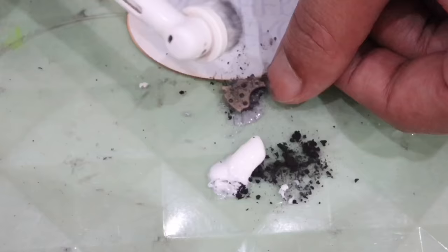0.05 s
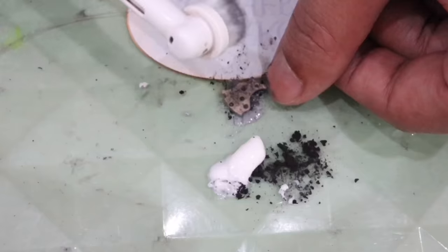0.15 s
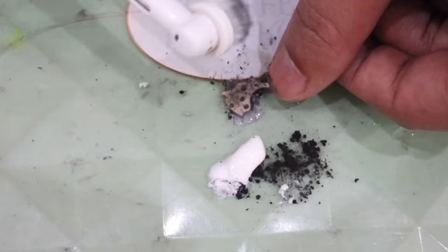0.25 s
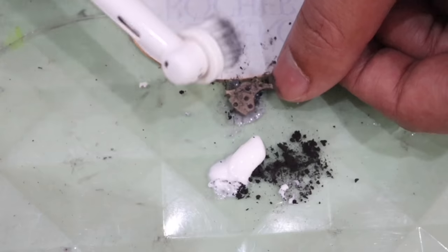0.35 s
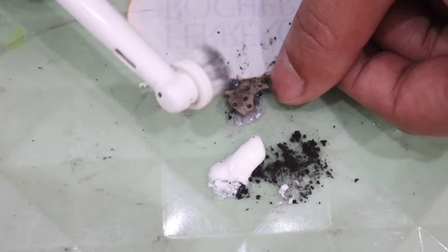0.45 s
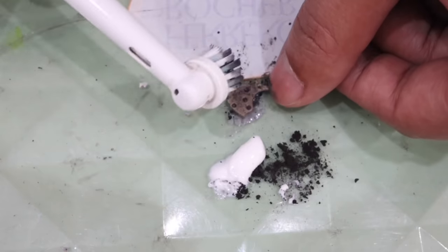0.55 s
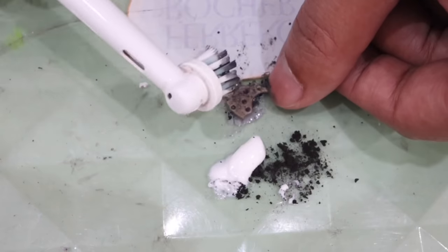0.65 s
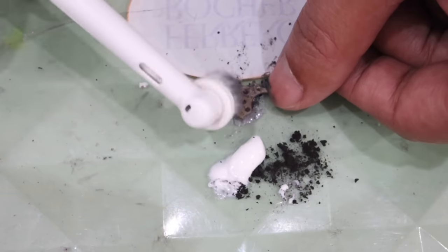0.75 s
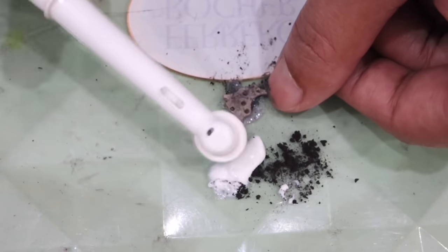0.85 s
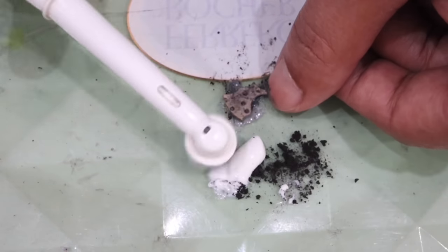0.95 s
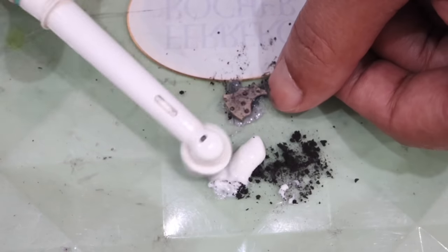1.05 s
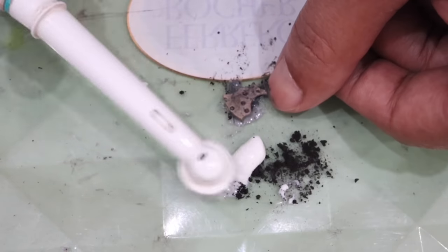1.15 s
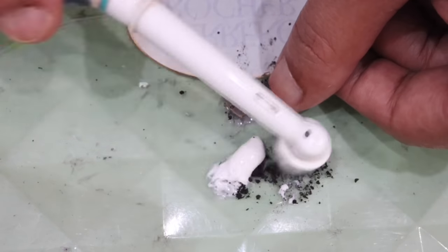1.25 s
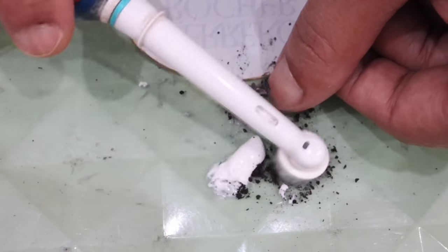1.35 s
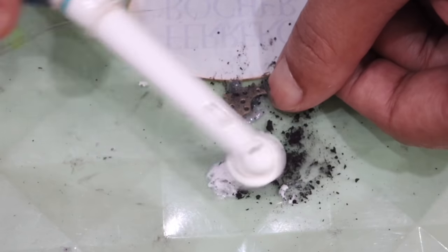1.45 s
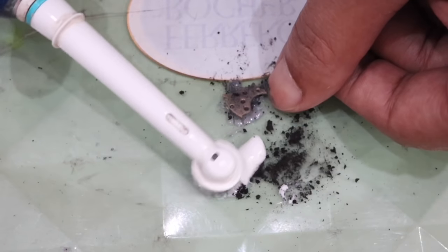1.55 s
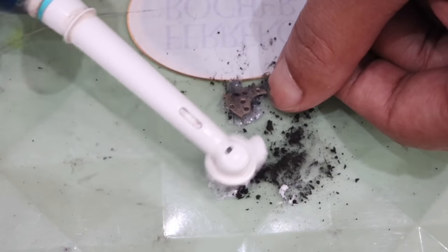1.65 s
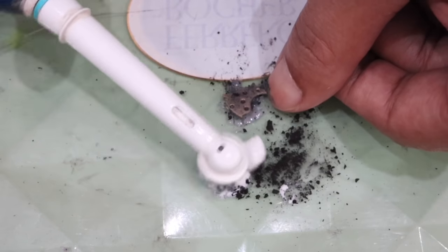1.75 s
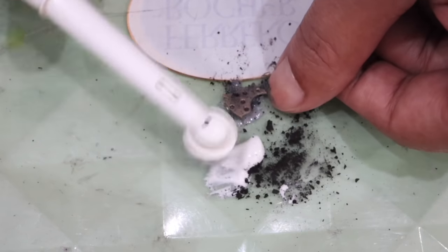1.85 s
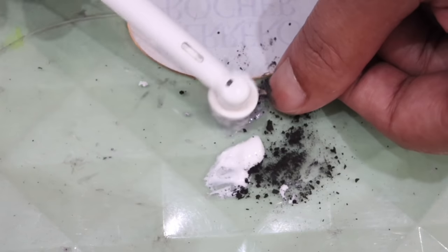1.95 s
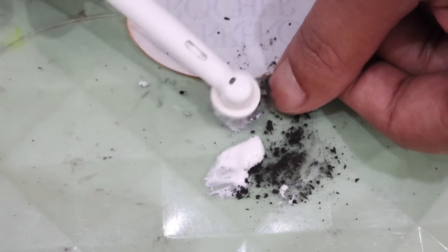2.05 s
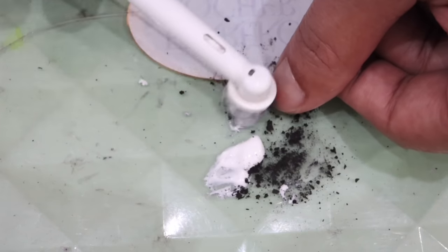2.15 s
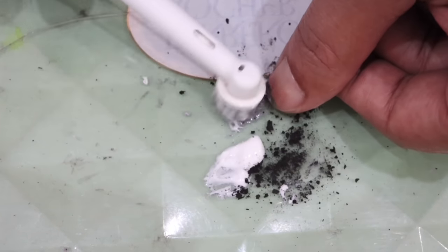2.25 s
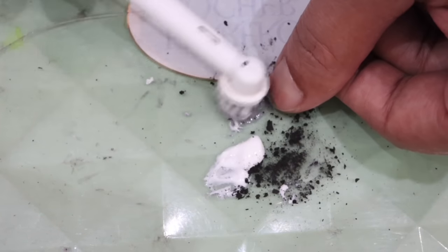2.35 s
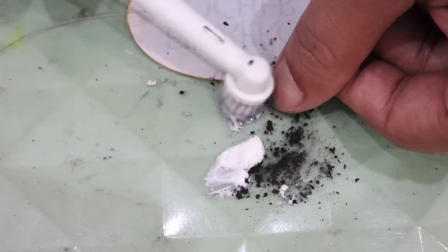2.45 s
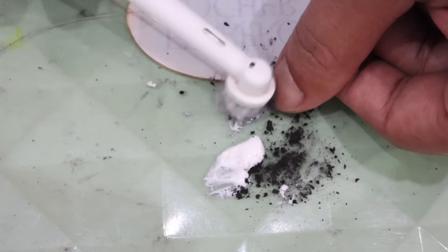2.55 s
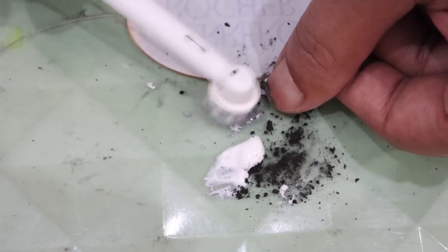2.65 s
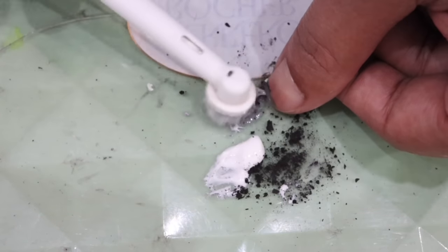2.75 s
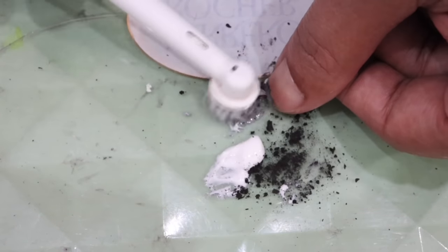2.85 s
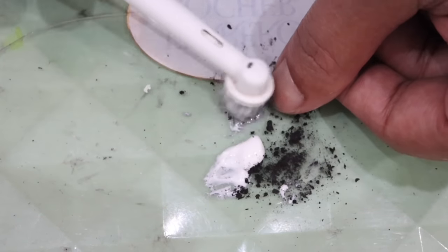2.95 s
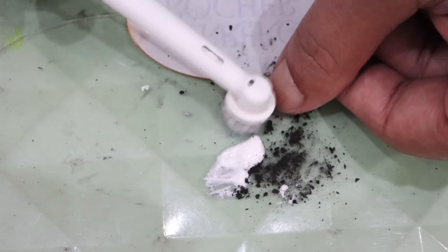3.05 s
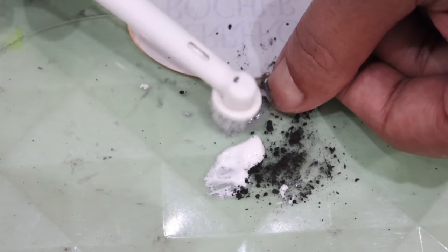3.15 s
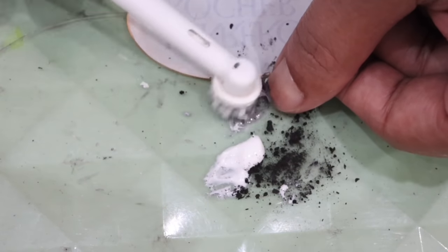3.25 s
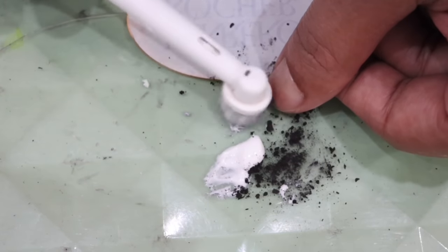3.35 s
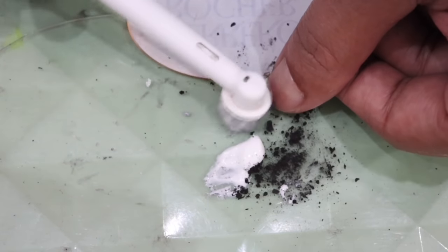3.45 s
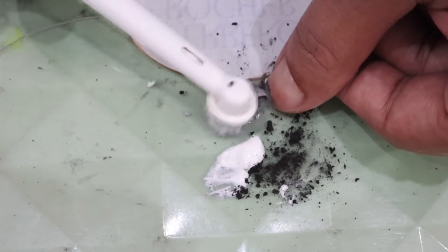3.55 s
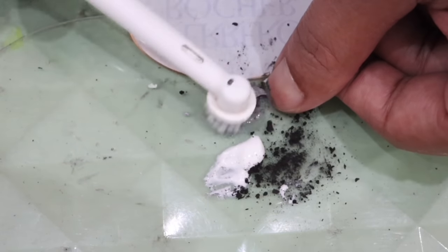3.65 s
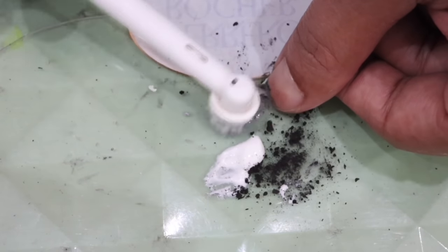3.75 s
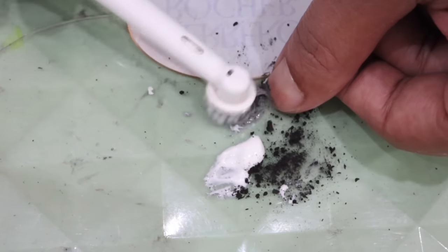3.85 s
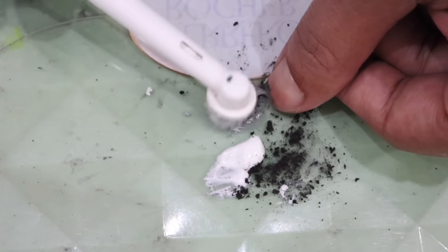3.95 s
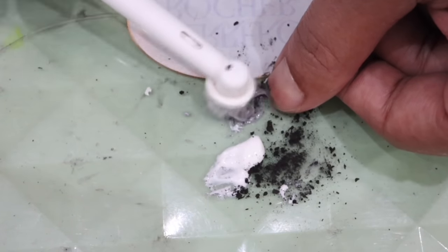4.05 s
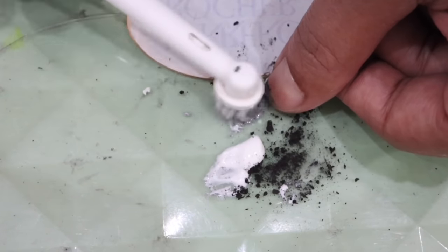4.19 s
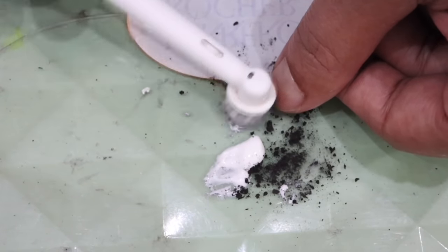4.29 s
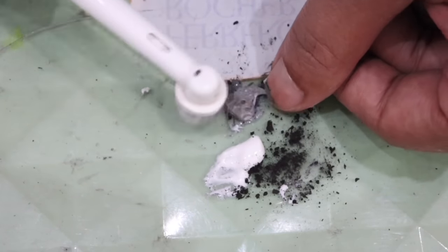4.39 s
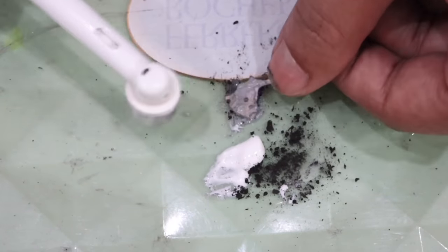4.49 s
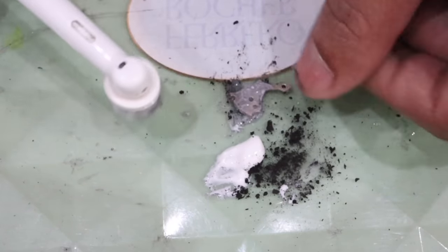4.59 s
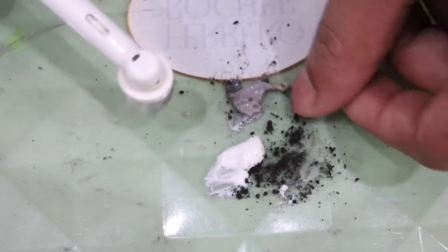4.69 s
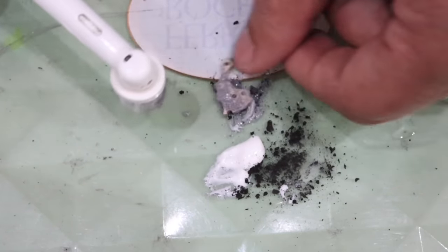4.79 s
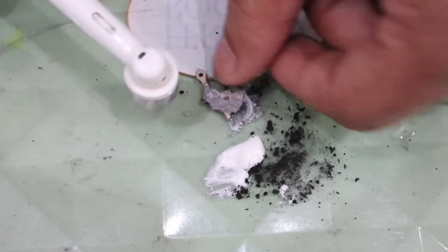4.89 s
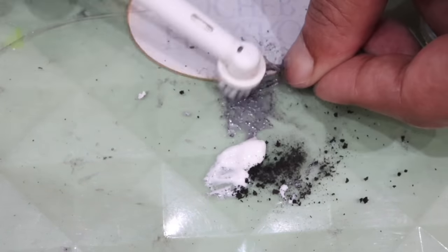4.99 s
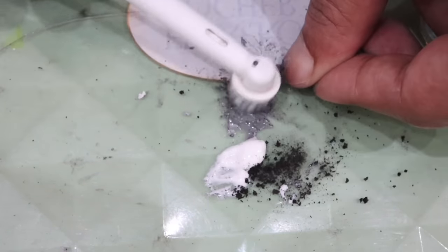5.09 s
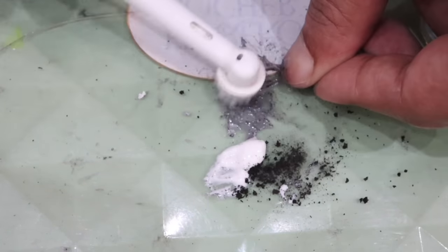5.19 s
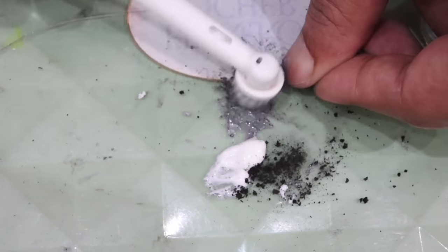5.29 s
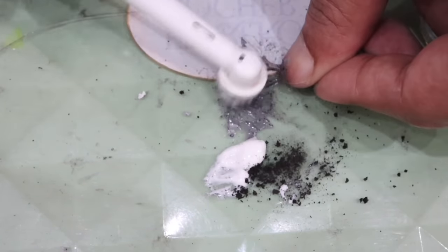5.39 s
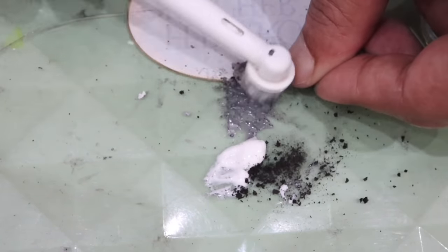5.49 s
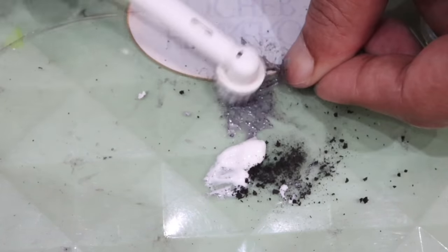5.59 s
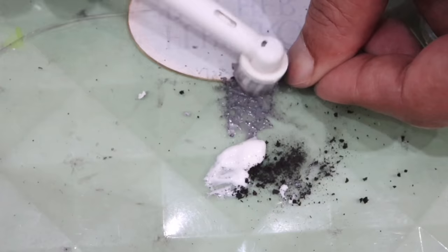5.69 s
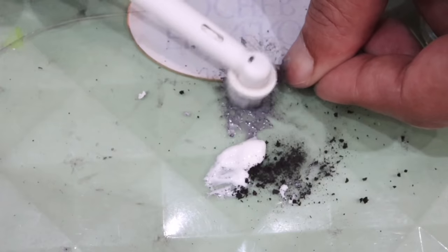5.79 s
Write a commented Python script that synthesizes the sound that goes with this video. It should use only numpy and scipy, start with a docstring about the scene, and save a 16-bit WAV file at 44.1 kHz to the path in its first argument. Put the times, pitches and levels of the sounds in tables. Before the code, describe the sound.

After half a second of silence, a small electric brush whirs close by in a quiet room. A hand shuffles on the bench and the head taps the glass plate. From about two seconds, bristles rub a small metal part in bursts, the whine swelling and buzzing under pressure, then brisk bright strokes to the end. Close stereo microphone.

```python
"""At a workbench in a quiet room, a small electric brush in the hand scrubs a tiny metal part on a glass plate.
Its gear train sounds tones locked to the big gear and pulsed noise whose tooth pattern repeats every turn.
Pressed down, the plate radiates the whine and rumbles; taps of the head ring its modes. After two handling
noises, each stroke of the bristles over paste and metal is resonant noise. The hand shuffles and bumps the bench."""
import sys
import numpy as np
from scipy import signal
from scipy.fft import rfft, irfft, next_fast_len
from scipy.io import wavfile
from scipy.ndimage import uniform_filter1d

SR = 44100
rng = np.random.default_rng(int(sys.argv[2]) if len(sys.argv) > 2 else 0)


def dump(signal):
    """Clip the signal to [-1, 1] and save it as 16-bit WAV at the path in sys.argv[1]."""
    limited = np.clip(np.atleast_2d(signal).T, -1, 1)
    pcm = np.round(limited * 32767).astype(np.int16)
    wavfile.write(sys.argv[1], SR, pcm)


N = 257103
TIME = np.arange(N) / SR  # [s]
START_S = 0.528  # the sound opens here
WHINE_ORDER = 50  # whine cycles per turn of the big gear
SWING_ORDER = 11  # swings of the tuft per turn of the big gear

# the head stays on the work:
# (touch time [s], lift time [s], resting hiss at touch [dB], resting hiss at lift [dB])
CONTACTS = [(2.229, 2.35, -48, -57), (2.623, 3.349, -58.5, -54), (3.489, 3.676, -52, -51),
            (3.741, 3.747, -70, -67), (3.836, 3.943, -54, -70), (4.054, 5.9, -57, -47.5)]
# two microphone ports hearing the motor: (frequency [Hz], likeness [0-1], left lead [rad], left minus right [dB])
PORTS_MOTOR = [(20, 1, 0, 0), (110, 1, 0, 0), (170, .98, 0, 0), (330, .4, 0, 1.5), (950, .4, -.6, 2),
               (1500, .6, 0, 5), (2900, .7, .8, 3), (4570, .6, 1.1, 1), (6800, .6, 2.4, 2),
               (11300, .6, 2.3, 2.5), (16000, .6, 2.4, 2.5)]
# the same ports hearing the work: (frequency [Hz], likeness [0-1], left lead [rad], left minus right [dB])
PORTS_WORK = [(20, 1, 0, 0), (640, 1, 0, 0), (1900, .995, 0, 0), (2500, .93, .25, 0), (3300, .75, .7, 0),
              (4740, .65, 1.5, 0), (6800, .6, 2.2, -.5), (10000, .6, 1.9, 0), (13000, .6, 1.7, 1),
              (16000, .55, 2.2, 1.5)]
# resonances of the housing: (frequency [Hz], width [Hz], height [dB])
HOUSING_RINGS = [(2420, 20, -12), (2700, 20, 4), (4910, 420, 0), (7690, 110, -6), (10400, 530, -11.5),
                 (13100, 74, 7)]


def gain_of(db):
    """Amplitude ratio: 20 dB is a factor of ten."""
    return 10 ** (np.asarray(db) / 20)


def evened(x):
    """Normalises mean power: scales to rms 1."""
    return x / np.sqrt(np.mean(x ** 2) + 1e-20)


def read(points, hz):
    """Interpolates the columns of a spectrum linearly on a log-frequency axis."""
    f, *columns = np.transpose(points)
    return np.squeeze([np.interp(np.log(hz + 1), np.log(f + 1), c) for c in columns])


def curve(rows):
    """Interpolates each column of a table linearly over time."""
    s, *columns = np.transpose(rows)
    return [np.interp(TIME, s, c) for c in columns]


def add(mix, s, sound):
    """Superposition: adds a sound to the mix from time s [s]."""
    part = mix[..., round(s * SR):][..., :sound.shape[-1]]
    part += sound[..., :part.shape[-1]]


def wander(hz):
    """Relaxation noise: a one-pole low-pass at hz turns white noise into a drift of rms 1."""
    pole = np.exp(-2 * np.pi * hz / SR)
    return evened(signal.lfilter([1], [1, -pole], rng.standard_normal(N)))


def slow(hz):
    """Smoothed drift: a moving average of half a period smooths relaxation noise, rms 1."""
    return evened(uniform_filter1d(wander(hz), round(SR / hz / 2)))


def coloured(drive, colour, ports, rings=()):
    """Source-filter principle: spectrum and resonances shape two drives, mixed to the ports' coherence."""
    size = next_fast_len(N)
    hz = np.fft.rfftfreq(size, 1 / SR)
    shared, differing = rfft(drive, size)
    likeness, lead, lean_db = read(ports, hz)
    side = np.array([[.5], [-.5]])  # left, right
    angle = np.arccos(np.clip(likeness, 0, 1)) / 2  # cos(2 * angle) is the correlation
    pair = shared * np.cos(angle) + 2 * side * differing * np.sin(angle)
    pair = pair * np.exp(1j * lead * side)
    peaks = 1 + sum(gain_of(db) / (1 + (2 * (hz - f) / w) ** 2) for f, w, db in rings)
    level = gain_of(read(colour, hz) + lean_db * side)
    return evened(irfft(pair * peaks * level, size)[:, :N])


def grit(grain_db, flutter_db, flutter_hz):
    """Granular noise: random grain sizes and a quick flutter modulate two drives alike."""
    grain = np.minimum(rng.exponential(1, N), 3)
    size = gain_of(grain_db * grain + flutter_db * wander(flutter_hz))
    return rng.standard_normal((2, N)) * size


def touch(start, end):
    """Contact envelope: a linear landing, then an exponential release after the lift."""
    land_s, lift_db_per_s = 0.017, 406
    return np.clip((TIME - start) / land_s, 0, 1) * gain_of(-lift_db_per_s * np.maximum(TIME - end, 0))


def room_tone():
    """Steady background: stationary noise with a fixed spectrum."""
    # colour of the quiet room: (frequency [Hz], relative density [dB per Hz])
    room_colour = [(12, -50), (25, -11), (80, -2.5), (300, -10), (500, -8.5), (900, -27), (1500, -39),
                   (2200, -25.5)]
    return gain_of(-77) * coloured(rng.standard_normal((2, N)), room_colour, PORTS_MOTOR)


def shuffle():
    """Sliding friction: lumpy low noise of the hand on the bench swells, sags and stops."""
    # colour of the bench: (frequency [Hz], relative density [dB per Hz])
    bench_colour = [(15, 4), (40, 0), (80, -4), (150, 0), (450, -10.5), (1000, -6), (1500, -14.5)]
    top_s, end_s, top_db, lumps_db = 0.606, 0.754, -58, 3.5
    rise_db_per_s, sag_db_per_s, stop_db_per_s = 130, 45, 600  # the stop adds to the sag
    since = TIME - top_s
    level_db = top_db + np.minimum(rise_db_per_s * since, -sag_db_per_s * since)
    level_db -= stop_db_per_s * np.maximum(TIME - end_s, 0)
    return gain_of(level_db) * coloured(grit(0.87, lumps_db, 50), bench_colour, PORTS_WORK)


def thumps():
    """Impulsive push: a low sine under a smooth, short envelope where the hand bumps the bench."""
    # bumps of the hand: (time [s], level [dB], frequency [Hz])
    bumps = [(5.114, -46.5, 75)]
    out, t = np.zeros(N), np.arange(3000) / SR
    for s, db, hz in bumps:
        cycles = hz * t
        envelope = 3.4 * cycles * np.exp(-1.6 * cycles ** 2)
        add(out, s, gain_of(db) * np.sin(2 * np.pi * cycles) * envelope)
    return out


def taps():
    """Modal excitation: a short scrape rings the plate's modes briefly and leaves a broad, dry crack."""
    # modes of the plate: (frequency [Hz], relative level [dB], time to fall 60 dB [s])
    plate_modes = [(596, -13, 0.021), (1900, -7.5, 0.018), (2610, -9, 0.012), (3290, 6.5, 0.013),
                   (4480, 4.5, 0.011), (5010, -2, 0.013), (6170, 0, 0.010), (7400, -2.5, 0.0081)]
    # taps of the head: (time [s], peak of the ring before the bass cut [dB], scrape decay [ms], 1.2 at least)
    tap_times = [(0.5475, -47, 2.0), (0.5663, -47, 2.8), (0.6175, -45.5, 2.4), (0.698, -43, 1.2),
                 (0.711, -42, 1.4), (0.7264, -42, 1.7), (0.931, -44.5, 1.8), (1.1574, -46, 3.6),
                 (1.202, -46.5, 3.2), (1.2643, -30, 6.5), (1.2945, -32.5, 3.1), (1.322, -38, 1.8),
                 (1.335, -42, 2.6), (1.9821, -29.5, 3.2), (2.0424, -31.5, 5.9), (2.2378, -35, 2.5),
                 (2.6301, -35.5, 1.5), (4.508, -42, 1.1), (4.805, -37, 2.8), (5.506, -45, 2.0)]
    crack_db = -10.5
    out, t = np.zeros((2, N)), np.arange(2000) / SR
    modes = sum(gain_of(db - 60 * t / t60) * np.cos(2 * np.pi * hz * t) for hz, db, t60 in plate_modes)
    no_bass = signal.butter(2, 500, "high", fs=SR)
    broad = signal.butter(1, [1300, 9000], "band", fs=SR)
    for s, db, scrape_ms in tap_times:
        lasting = max(scrape_ms, 1.2) / 1000
        shape = np.exp(-t / lasting) * np.minimum(4 * t / lasting, 1)
        noise = rng.standard_normal((3, len(t))) * shape
        blow = noise[2:] + 0.28 * noise[:2]  # mostly common to both channels
        ring = signal.fftconvolve(blow, modes[None])[:, :len(t)]
        crack = gain_of(crack_db) * signal.lfilter(*broad, blow)
        sound = ring / abs(ring).max() + crack
        add(out, s, gain_of(db) * signal.lfilter(*no_bass, sound))
    return out


def drumming(level_db):
    """Forced plate vibration: the pressed plate rumbles in step with the level of the whine."""
    # rumble of the plate: (frequency [Hz], relative density [dB per Hz])
    rumble_colour = [(60, -42), (150, 1.5), (250, 1), (450, 1.5), (620, 13.5), (800, 0.5), (1000, 5),
                     (1500, 4), (2200, 4.5)]
    return gain_of(level_db - 5.5) * coloured(grit(0.54, 3.7, 44), rumble_colour, PORTS_WORK)


def gear():
    """Gear kinematics: integrated pitch gives turns of the big gear; contact adds to the whine level [dB]."""
    # gear whine, shifted a little by load on the head: (time [s], pitch [Hz])
    whine_pitch = [(.55, 685.5), (2.2, 684.3), (2.32, 687.5), (2.45, 684.4), (2.62, 685), (2.68, 690),
                   (3.02, 696), (3.12, 694.5), (3.25, 688.5), (3.5, 687), (3.6, 683.5), (3.7, 686.5),
                   (3.93, 682.5), (4.2, 690), (4.85, 689), (5.2, 688), (5.35, 685), (5.83, 688.5)]
    # whine of the lifted brush, before the trims in whine(): (time [s], level [dB])
    air_level = [(.54, -67), (.6, -59), (.67, -64), (.82, -70), (3.5, -69.5), (3.7, -81), (3.99, -90),
                 (4.04, -75)]
    # pressure of the head, as whine level while it touches, before the same trims: (time [s], level [dB])
    press_level = [(2.24, -54.5), (2.345, -49), (2.64, -63), (2.776, -55), (2.83, -62), (2.86, -54.5),
                   (2.975, -50.5), (3.022, -57.5), (3.06, -53), (3.15, -64), (3.254, -51.5), (3.34, -58),
                   (3.5, -60.5), (3.55, -53), (3.67, -59), (3.75, -57.5), (3.86, -53), (4.08, -50.5),
                   (4.35, -52.5), (4.4, -51), (4.48, -49), (4.89, -50.5), (4.945, -43.5), (5.01, -48),
                   (5.14, -44.5), (5.29, -49.5), (5.33, -53), (5.39, -46), (5.83, -46.5)]
    wobble_db, wobble_hz = 1.0, 36
    turns = np.cumsum(curve(whine_pitch)[0]) / SR / WHINE_ORDER
    held = sum(touch(start, end) for start, end, *_ in CONTACTS)
    pressed = gain_of(curve(press_level)[0] + wobble_db * slow(wobble_hz))
    level = gain_of(curve(air_level)[0]) + held * pressed
    tick_s = 1.959  # a tick falls here, and on every whole turn from here
    return turns - np.interp(tick_s, TIME, turns), 20 * np.log10(level)


def motor(turns):
    """Periodic excitation: tooth-by-tooth pulses and one sharp tick a turn drive the housing's resonances."""
    # colour of the housing: (frequency [Hz], relative density [dB per Hz])
    housing_colour = [(470, -43), (800, -23), (940, -24), (1330, -16.5), (1580, -13.5), (1670, -13),
                      (2480, -5.5), (6780, -4.5), (12000, -4), (15600, -6)]
    # treble ring of the housing: (frequency [Hz], relative density [dB per Hz])
    treble_colour = [(8000, -30), (11000, -14), (12600, -7), (13400, 0), (14200, -7), (15700, -12)]
    # drive of the treble ring before pulsing, scaled to rms 1 afterwards: (time [s], relative level [dB])
    treble_level = [(.6, 2), (.68, 15.5), (1.0, 8), (1.35, 6.5), (1.8, 4), (2.1, 11.5), (2.6, 8), (3.1, 2),
                    (3.6, 12.5), (3.8, 3), (4.1, 11.5), (4.3, -31), (5.83, -1)]
    rattle_db, rise_s = -52, 0.068
    level = gain_of(rattle_db) * np.clip((TIME - START_S) / rise_s, 0, 1)
    pulse = SWING_ORDER * turns % 1
    tooth = rng.standard_normal(50)[(50 * turns % 50).astype(int)]  # the same uneven teeth every turn
    beat = (1 + .5 * np.exp(-pulse / 0.17)) * gain_of(1.12 * tooth)
    body = coloured(grit(0.37, 0.21, 180) * beat, housing_colour, PORTS_MOTOR, HOUSING_RINGS)
    sizes = rng.random(100)[np.floor(turns).astype(int) % 100]  # one tick size a turn
    tick = 6 * sizes * np.exp(-(turns % 1) / .012)
    strike = gain_of(curve(treble_level)[0]) * beat ** 2.8 + tick
    ring = coloured(grit(1.5, 2.5, 150) * strike, treble_colour, PORTS_MOTOR)
    return level * (body + gain_of(-4.5) * ring)


def plate_tones(cycle):
    """Structural radiation: the plate sounds the whine, of rms 0.5, with drifting orders of the gear's turn."""
    # gear tones through the plate: (multiple of the turn rate, relative level before the trim [dB])
    plate_orders = [(11, -23), (22, -30), (25, -24), (33, -27), (44, -25), (61, -28), (72, -22), (75, -27),
                    (83, -28), (100, -23), (150, -21)]
    trim_db, drift_db, drift_hz = -5.5, 7.4, 6.3
    pressed = np.sin(WHINE_ORDER * cycle) / np.sqrt(2)
    for order, db in plate_orders:
        level_db = db + trim_db + drift_db * np.tanh(wander(drift_hz))
        pressed += gain_of(level_db) * np.sin(order * cycle + 2 * np.pi * rng.random())
    return pressed


def air_tones(cycle):
    """Airborne radiation: a fixed set of gear tones, rounded to whole orders of the gear's turn."""
    # gear tones at idle speed, before the trim in whine(): (frequency [Hz], amplitude [dB])
    free_lines = [(301.5, -86), (532.9, -84.5), (683.7, -72), (834.4, -89.5), (1136, -91), (1206, -84),
                  (1287, -81), (1367, -83.5), (1437, -108), (1507, -83), (1669, -93), (1712, -80),
                  (1820, -81.5), (1970, -103), (2051, -80.5), (2342, -83), (2396, -77), (2546, -76.5)]
    idle_hz = 683.7
    free = np.zeros((2, N))
    for hz, db in free_lines:
        order = round(WHINE_ORDER * hz / idle_hz)
        if order != WHINE_ORDER:  # the whine itself is in plate_tones
            phase = 2 * np.pi * rng.random() + np.array([[0], [hz / 2500]])  # the right leads
            free += gain_of(db + 2.0 * wander(2.7)) * np.sin(order * cycle + phase)
    return free


def whine(turns, level_db):
    """Gear-mesh tones: harmonics of the turn rate, with a slow random balance between the channels."""
    cycle = 2 * np.pi * turns
    pressed, free = plate_tones(cycle), air_tones(cycle)
    sway_db = 0.34 + 0.4 * slow(1.2)  # the whine's balance drifts slowly at random between left and right
    sides_db = np.array([[1], [-1]]) * sway_db
    return gain_of(2.5) * (gain_of(level_db + 2.0 + sides_db) * pressed + free)


def resting():
    """Steady friction: the gain of the tuft lying on the work drifts evenly in dB through each contact."""
    return sum(touch(start, end) * gain_of(np.interp(TIME, [start, end], db)) for start, end, *db in CONTACTS)


def chatter(turns):
    """Periodic impact: the head's rim knocks against the part once per swing, breaking the hiss into one burst
    per swing."""
    # knocking spells: (start [s], end [s], depth [0-1])
    spells = [(4.559, 4.612, .85), (5.5055, 5.55, .55)]
    decay = 0.5  # decay constant of a burst, as part of a swing
    gain = np.ones(N)
    for start, end, depth in spells:
        swings = SWING_ORDER * (turns - np.interp(start, TIME, turns)) % 1
        burst = 1 - depth + depth * np.exp(-swings / decay) / decay
        gain = np.where((TIME > start) & (TIME < end), burst, gain)
    return gain


def bristles(turns):
    """Friction noise: the swinging tuft hisses softly at rest, suddenly in each rub, brighter on metal."""
    # two handling noises of the hand and brush, then strokes: (start [s], end [s], hiss on paste [dB],
    # hiss on metal [dB], change over the rub [dB], plate body [dB], rasp frequency [Hz], rasp [dB])
    rubs = [(0.561, 0.63, -56.5, -60, 10, -56.5, 1950, -83),
            (0.689, 0.76, -61, -55.5, -5, -61.5, 2850, -81),
            (1.292, 1.354, -54.5, -55, -11, -77, 3340, -54),
            (2.249, 2.357, -46, -50, -1.5, -52.5, 3440, -51),
            (2.627, 2.697, -51, -51, -8.5, -55.5, 2530, -70),
            (2.694, 2.77, -50.5, -39.5, 5.5, -59.5, 4940, -44.5),
            (2.776, 2.872, -51, -41.5, 2, -62, 4830, -48), (2.88, 2.971, -52, -43.5, 3, -58.5, 4570, -52.5),
            (3.271, 3.334, -50, -39, 2.5, -56.5, 3480, -54), (3.48, 3.601, -55, -52, 6, -85, 2820, -52),
            (3.635, 3.757, -51, -50, 3, -65, 3500, -52), (3.841, 3.949, -51.5, -55, 3.5, -70, 2750, -60),
            (4.557, 4.61, -58, -42, 1, -63, 4150, -48), (4.646, 4.687, -50, -45, 9, -64, 2740, -56.5),
            (4.801, 4.86, -53, -46, -4, -68, 3220, -61), (4.906, 5.06, -47, -38, -5, -64, 3150, -55.5),
            (5.061, 5.091, -54, -40.5, 16, -51, 4500, -48), (5.137, 5.212, -51, -40.5, 2, -70, 4800, -52),
            (5.253, 5.323, -47, -39.5, 2, -54, 3080, -52.5), (5.371, 5.412, -50, -37.5, 1, -55, 4900, -62),
            (5.502, 5.552, -48, -39, 1, -60, 4700, -48), (5.609, 5.695, -51, -38.5, 5, -54.5, 3480, -51),
            (5.737, 5.82, -52, -43, -3, -54.5, 3370, -53.5)]
    # colour on paste: (frequency [Hz], relative density [dB per Hz])
    paste_colour = [(470, -58), (800, -40), (1000, -52), (1110, -17), (1340, 5), (1440, -4.5), (2470, 2),
                    (6650, 4), (9220, -49), (14100, -51), (16000, -84)]
    # colour on metal: (frequency [Hz], relative density [dB per Hz])
    metal_colour = [(900, -39), (1500, -28), (2500, -21), (3300, -5.5), (4100, -0.5), (4800, -0.5),
                    (5800, -1.5), (7300, 4), (9200, -1), (11500, -14), (13200, -3.5), (14400, -3.5),
                    (15700, -11)]
    # resonances of the part and the plate under the tuft: (frequency [Hz], width [Hz], height [dB])
    metal_rings = [(1848, 186, 5.5), (2538, 44, 8), (3304, 13, 12.5), (4010, 24, 2), (4900, 130, -4),
                   (6160, 22, -11), (6570, 76, 2), (7150, 64, 7.5), (7430, 55, 0), (8550, 43, -1.5),
                   (10080, 190, 11), (10860, 99, 16.5), (12000, 260, 14), (14800, 240, 1)]
    # colour of the plate body under a rub: (frequency [Hz], relative density [dB per Hz])
    body_colour = [(18, -12), (40, -37), (150, -9), (350, -12), (535, -8.5), (800, -3), (996, 2),
                   (1500, -17), (2000, -11.5)]
    # colour of the resting tuft: (frequency [Hz], relative density [dB per Hz])
    resting_colour = [(470, -13), (800, -11), (831, -29), (1630, -7), (2020, 2), (3340, 4), (4080, 6.5),
                      (4460, 0.5), (4930, 5.5), (6740, 6), (11800, -23.5), (13400, -1), (16000, -12)]
    swing_phase = 2 * np.pi * SWING_ORDER * turns
    swing = 1 + .06 * np.cos(swing_phase) + .07 * np.cos(2 * swing_phase)
    paste = coloured(grit(4.5, 2.85, 220) * swing, paste_colour, PORTS_WORK, metal_rings)
    paste = paste * gain_of(0.5 * wander(27))
    metal = coloured(grit(4.2, 0.64, 290) * swing, metal_colour, PORTS_WORK, metal_rings)
    metal = metal * gain_of(0.91 * wander(34))
    scratch = coloured(grit(8.5, 1.8, 200) * swing, paste_colour, PORTS_WORK)
    body = coloured(grit(1.0, 1.9, 94), body_colour, PORTS_WORK)
    rest = coloured(grit(0.63, 0.91, 200) * swing, resting_colour, PORTS_WORK, HOUSING_RINGS[2:3])
    out = resting() * gain_of(1.5 * wander(29)) * rest
    knocks = chatter(turns)
    for start, end, paste_db, metal_db, change_db, body_db, rasp_hz, rasp_db in rubs:
        span = slice(round(start * SR) - 500, round(end * SR) + 3000)
        t, length = TIME[span] - start, end - start
        rise = np.clip(t / 0.01 + .5, 0, 1)
        fall = np.exp(-np.maximum(t - length + 0.0084, 0) / 0.01)
        change = gain_of(change_db * np.clip(t / length - .5, -.5, .5))
        shape = rise * fall * knocks[span] * change
        # the gap under the tilted head favours one broad band
        gap = signal.iirpeak(rasp_hz, 3.0, SR)
        rasp = evened(signal.lfilter(*gap, signal.lfilter(*gap, scratch[:, span])))
        hiss = gain_of(paste_db) * paste[:, span] + gain_of(metal_db) * metal[:, span]
        out[:, span] += shape * (hiss + gain_of(body_db) * body[:, span] + gain_of(rasp_db) * rasp)
    return out


def scene():
    """Superposition of the quiet room, hand, plate and brush."""
    turns, level_db = gear()
    background = room_tone() + shuffle() + thumps()
    plate = taps() + drumming(level_db)
    brush = motor(turns) + whine(turns, level_db) + bristles(turns)
    return background + plate + brush


def record(dry):
    """Linear-phase band limiting: the sound fades in from silence, then a low-pass trims the treble."""
    fade_in_s, edge_hz = 0.02, 15800
    opened = dry * np.clip((TIME - START_S) / fade_in_s, 0, 1) ** 2
    low_pass = signal.firwin(1023, edge_hz, window=("kaiser", 8), fs=SR)
    return signal.oaconvolve(opened, low_pass[None], "same")


dry = scene()
out = record(dry)
dump(out)
```